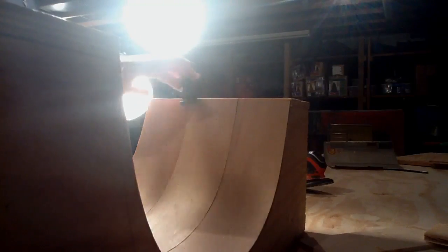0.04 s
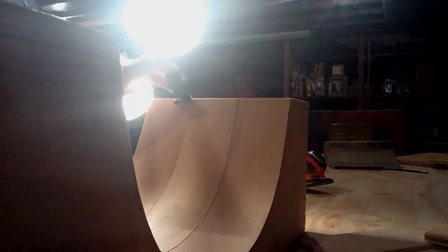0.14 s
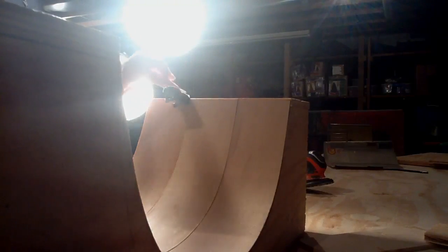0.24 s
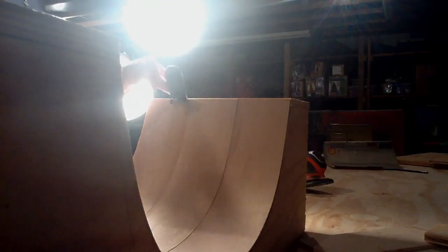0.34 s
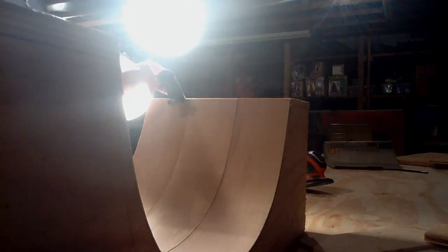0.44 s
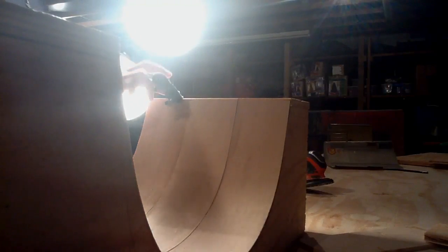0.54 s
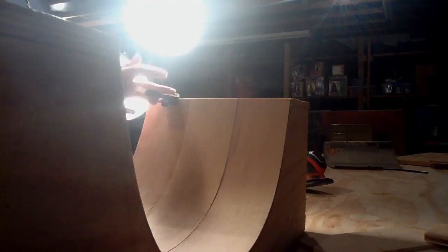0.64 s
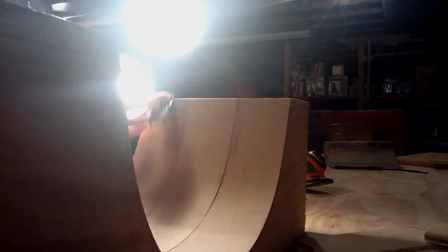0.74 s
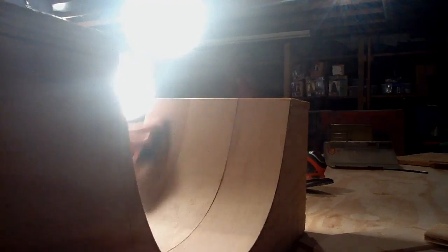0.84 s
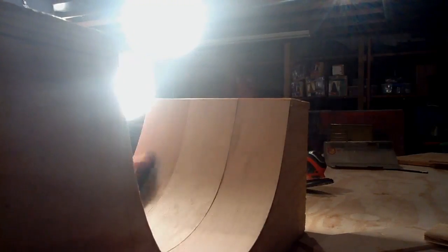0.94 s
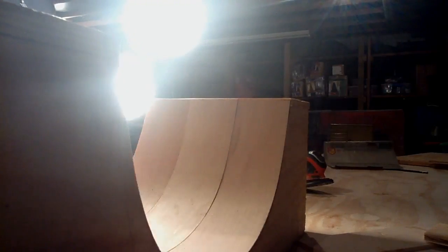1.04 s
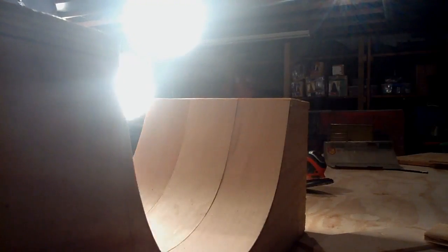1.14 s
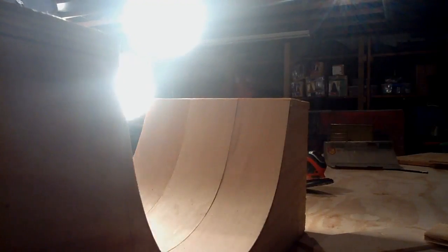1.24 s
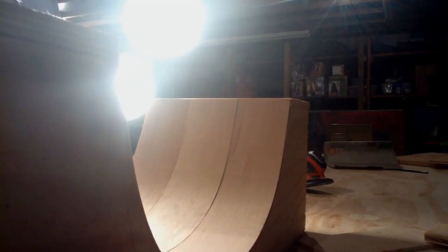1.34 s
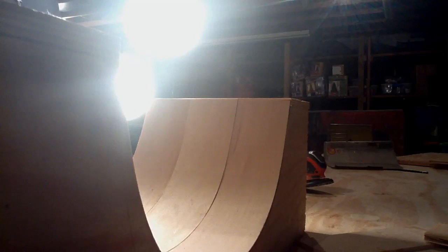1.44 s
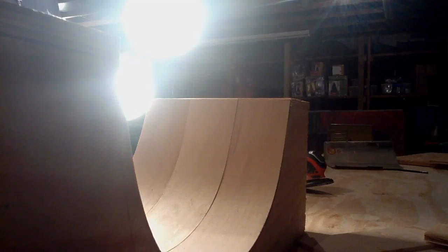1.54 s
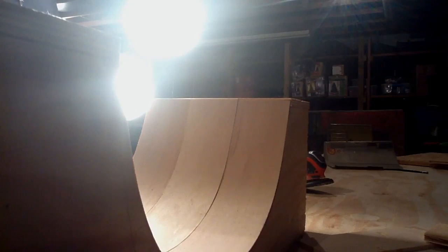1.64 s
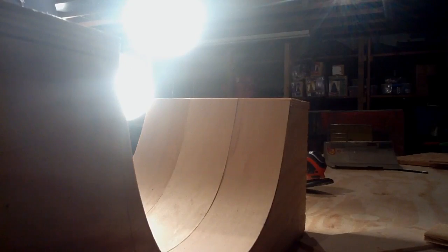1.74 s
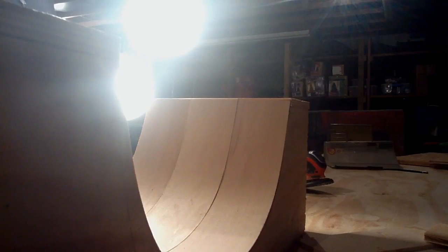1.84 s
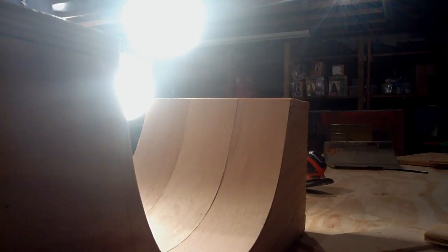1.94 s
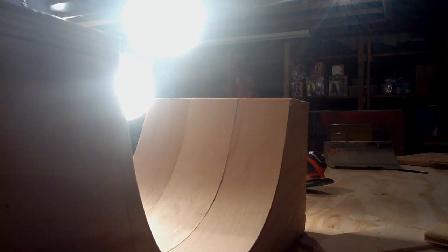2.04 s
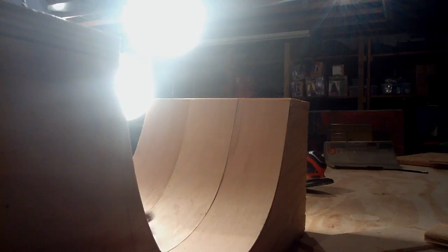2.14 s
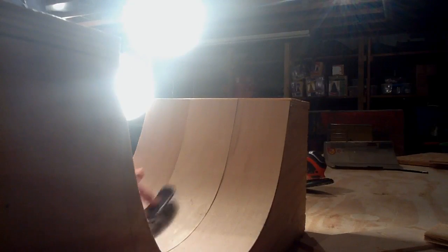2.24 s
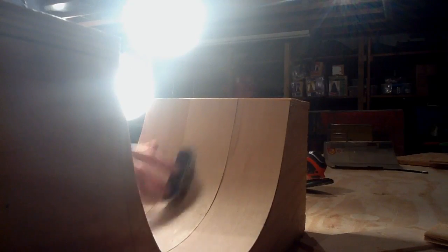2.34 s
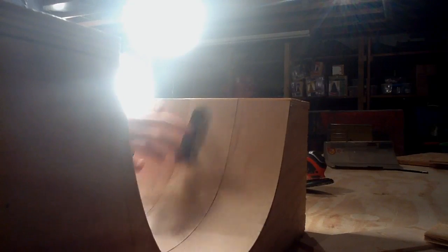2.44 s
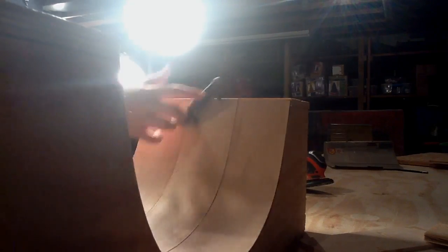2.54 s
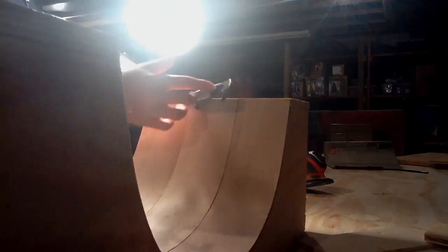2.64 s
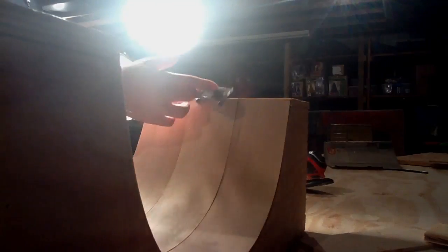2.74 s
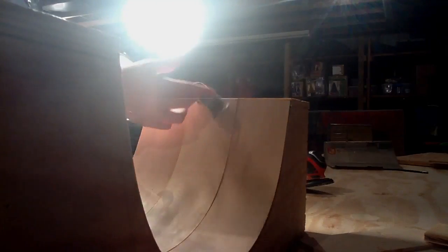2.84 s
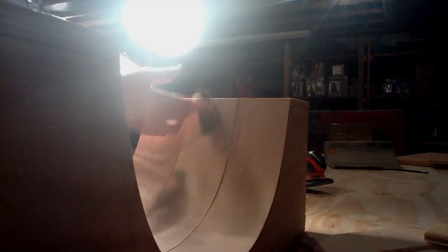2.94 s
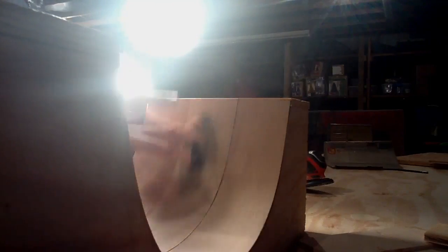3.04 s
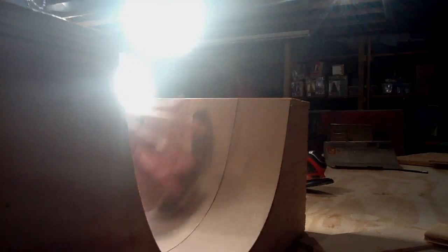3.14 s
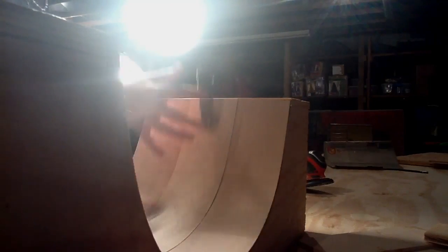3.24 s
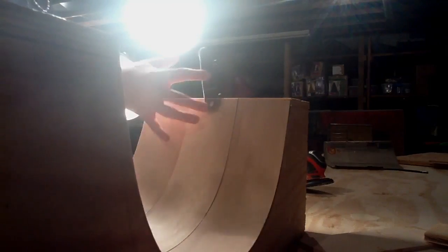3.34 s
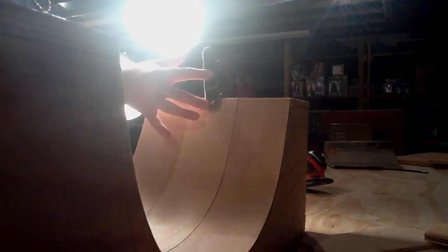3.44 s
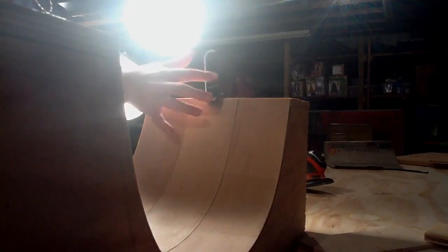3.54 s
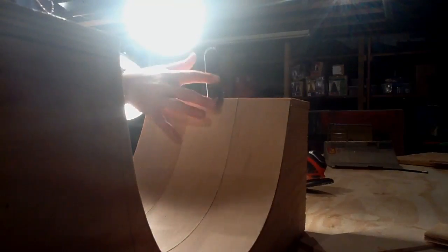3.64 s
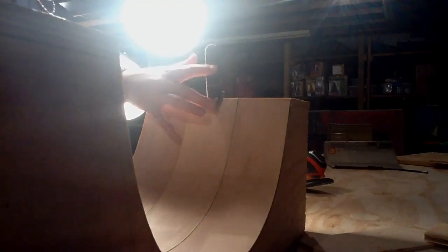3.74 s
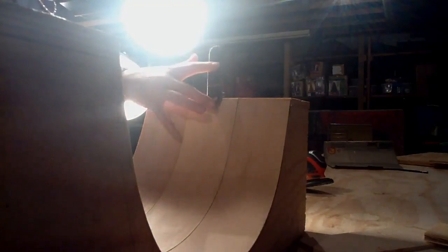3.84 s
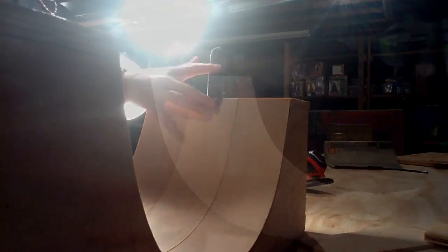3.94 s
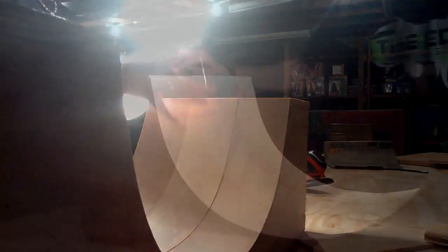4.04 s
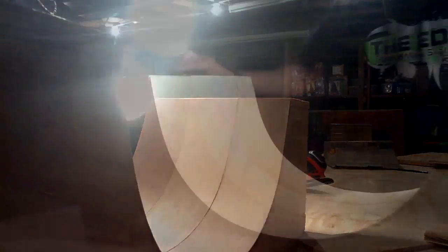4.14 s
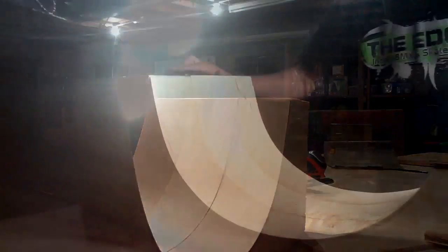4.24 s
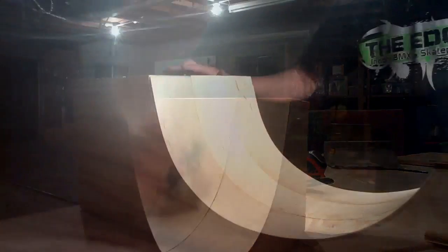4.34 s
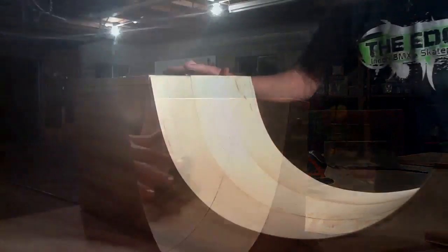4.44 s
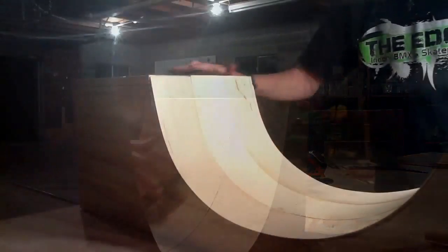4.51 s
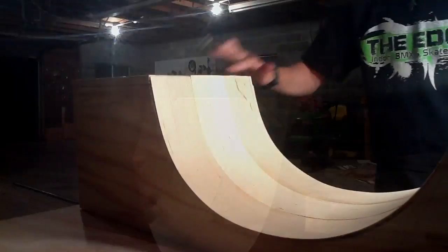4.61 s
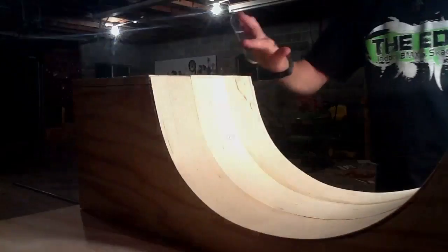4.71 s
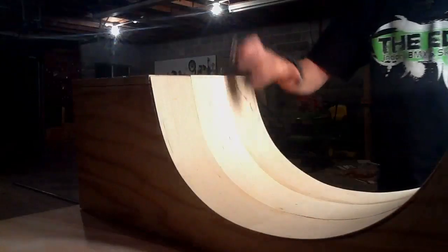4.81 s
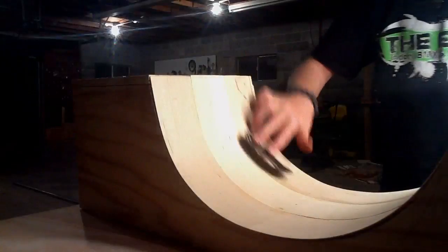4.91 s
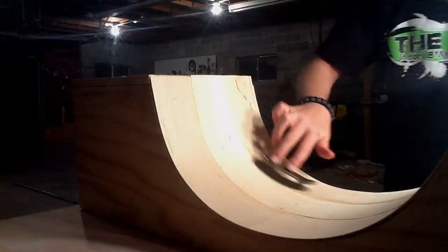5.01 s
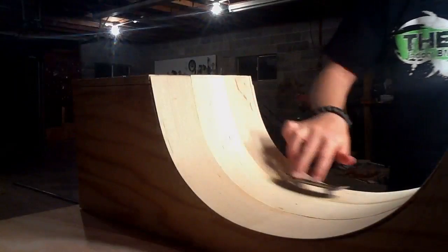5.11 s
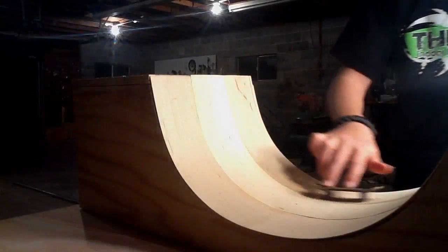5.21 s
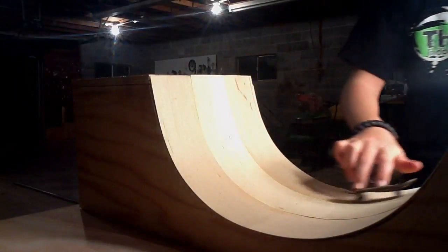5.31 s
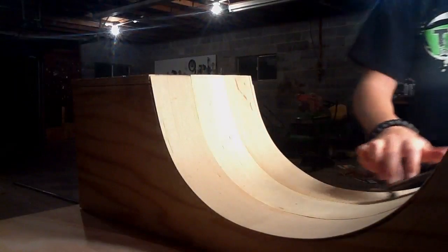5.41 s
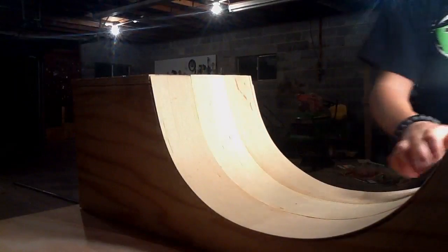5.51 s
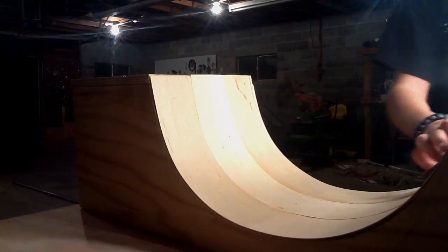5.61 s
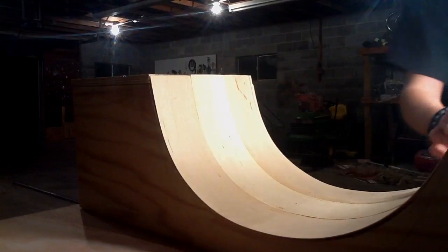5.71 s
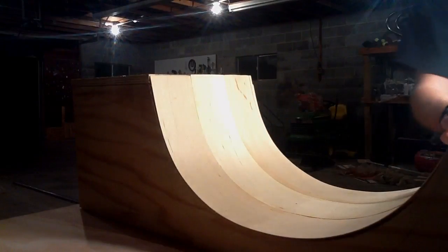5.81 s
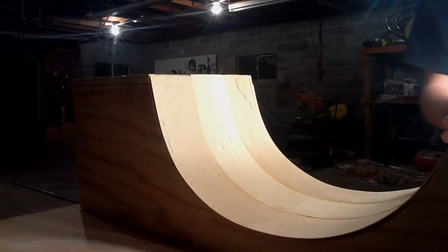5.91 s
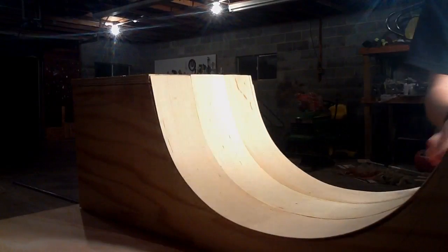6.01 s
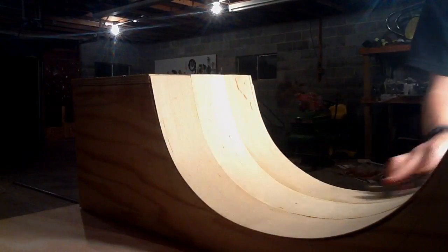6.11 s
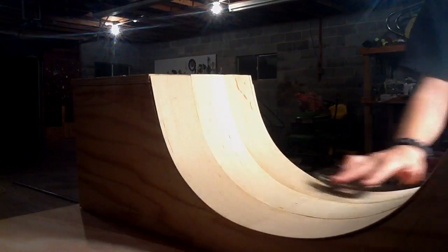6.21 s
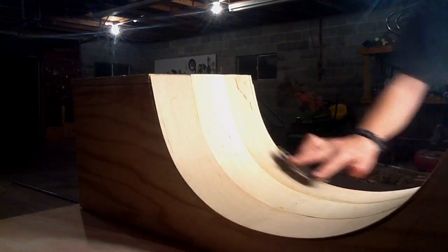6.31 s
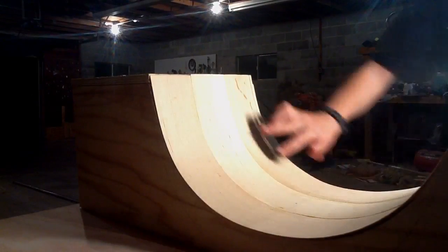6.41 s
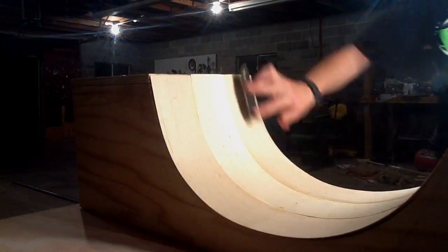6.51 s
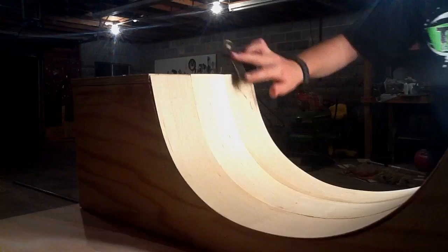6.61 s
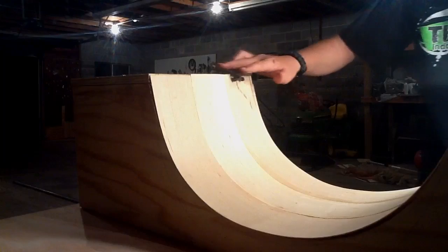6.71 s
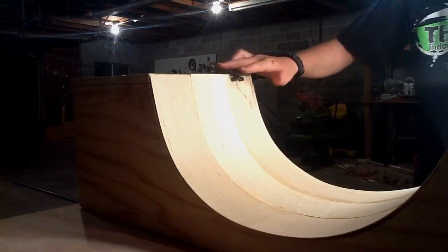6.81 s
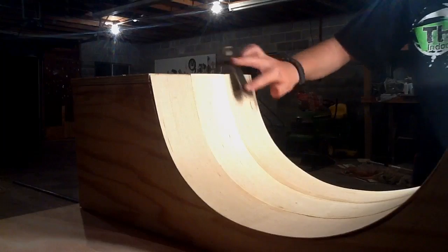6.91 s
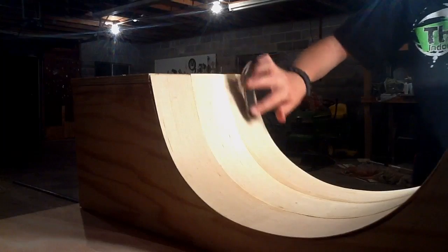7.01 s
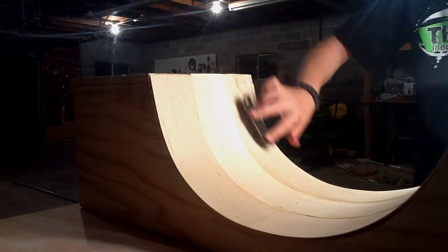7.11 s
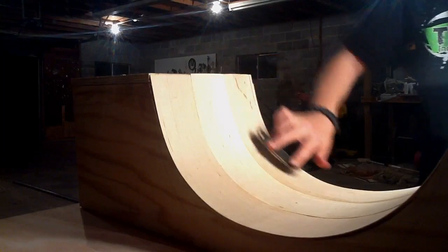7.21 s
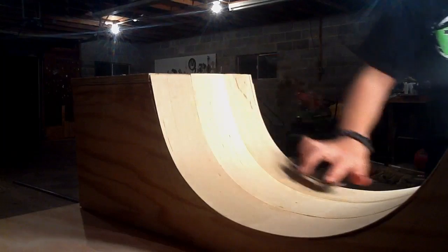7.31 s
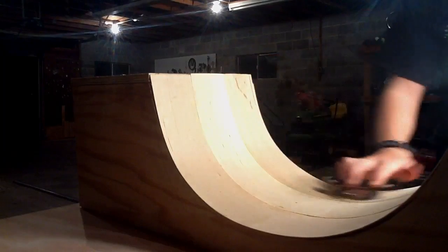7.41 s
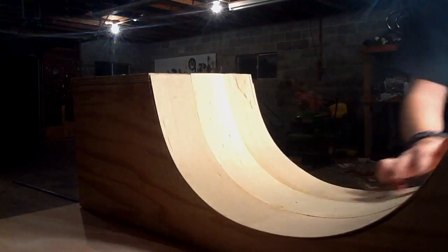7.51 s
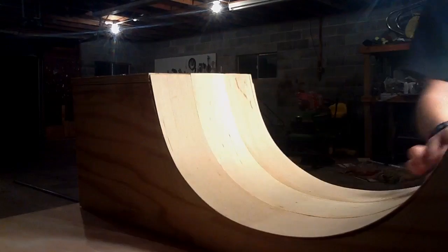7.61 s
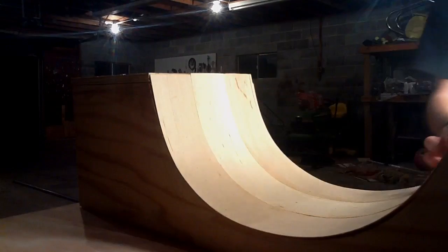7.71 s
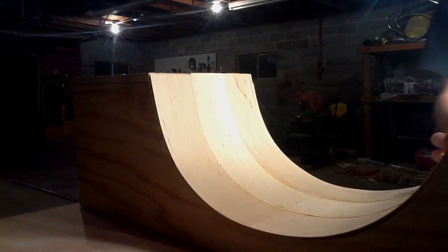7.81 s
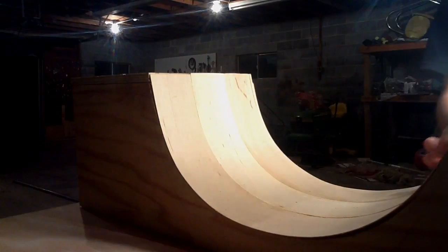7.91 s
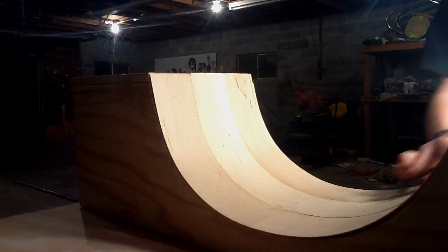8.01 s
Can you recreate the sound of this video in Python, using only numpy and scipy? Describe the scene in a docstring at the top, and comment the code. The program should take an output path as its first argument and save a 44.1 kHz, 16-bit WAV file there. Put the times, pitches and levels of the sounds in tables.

```python
"""Light knocks on hollow plywood, over steady microphone hiss: a toy skateboard is driven by hand
up and down a ramp in a barn. Its hard little wheels rattle over the grain and set the ramp ringing.
Taps and landings knock the same wood and echo briefly; hard landings jingle the loose axles.
The first ride breaks off and a low hum swells and fades. The second ride has more bass,
and a narrow whirr marks its lip tricks."""
import sys
import numpy as np
from scipy import signal
from scipy.fft import rfft, irfft
from scipy.io import wavfile

SR = 44100
rng = np.random.default_rng(int(sys.argv[2]) if len(sys.argv) > 2 else 0)


def materialize(psi):
    """Save the field psi as 16-bit PCM at rate SR to the path in sys.argv[1].

    A 1-D psi becomes a single channel; in a 2-D psi each row is a channel.
    """
    bounded = np.clip(np.atleast_2d(psi).T, -1, 1)
    quanta = np.round(bounded * 32767).astype(np.int16)
    wavfile.write(sys.argv[1], SR, quanta)


N = 355446

# Colour of the hiss. Each row: frequency in Hz, relative spectral level in dB.
HISS_SPECTRUM = [(18, -76), (62, -19), (173, 2), (256, -4), (410, -5.5), (443, 1.5), (492, -20.5),
                 (767, -18), (1260, -12), (2420, -19), (5170, -21), (6210, -22.5), (8280, -20),
                 (10700, -11.5), (15500, -30)]
# Deck and wheels hitting the ramp. Each row: start in seconds, panel peak in dB, boom and crack peaks
# in dB against it, panel pitch at the spot struck in Hz, contact time in seconds, hardness as a treble
# slope in dB per octave, crack pitch in Hz.
BLOWS = [(0.002, -36.5, 15.5, 2, 1300, 0.003, 14, 2290), (0.064, -44, 13.5, 3, 1210, 0.0047, 11, 2740),
         (0.395, -36.5, 10, -5.5, 696, 0.0069, 7, 2440), (0.662, -26, 1, -13, 680, 0.0062, 3, 2290),
         (0.755, -51, 13, -14, 703, 0.0049, 7, 2300), (0.779, -29, 0, -10, 690, 0.0021, 20, 2390),
         (0.814, -28, -30, -5.5, 700, 0.0033, 6, 2380), (0.965, -20, 9, 5, 1570, 0.0066, -1, 4800),
         (0.969, -13.5, 3.5, 2, 1580, 0.005, -10, 2700), (1.525, -13, -20, -10, 1010, 0.0034, -12, 4900),
         (1.538, -27.5, -6.5, 2.3, 1900, 0.003, -9, 3620), (2.521, -35, 20.5, 6.5, 950, 0.0037, -3, 3010),
         (2.678, -18.5, 7.5, -18, 1135, 0.0023, 13, 2760), (2.764, -43, 9, 1, 977, 0.0056, 23, 4940),
         (2.841, -19, -7.5, 6.5, 2010, 0.0022, -12, 4600), (2.853, -25.5, 0, -11, 1240, 0.0035, 5, 4000),
         (2.874, -25, -13, 0, 1090, 0.0036, -14, 2440), (2.932, -34, 4, -5, 1090, 0.0034, 3, 2850),
         (2.974, -28.5, 4, -5, 1120, 0.003, 4, 2990), (2.995, -25, 4, -7, 1080, 0.0037, -7, 2820),
         (3.117, -32, -4, -4, 1100, 0.0013, 8, 6200), (3.160, -16, 3.5, 2.5, 1060, 0.012, -37, 2760),
         (3.173, -10.5, -14, -3.5, 1130, 0.0037, -11, 2800),
         (3.318, -21.5, -19, -0.5, 1520, 0.0088, -22, 3250),
         (3.403, -18.5, 1.5, -9, 1300, 0.0074, -9, 2800), (3.627, -22, -2, -6, 700, 0.0025, -11, 2700),
         (3.942, -28, -2.5, -1.5, 1800, 0.0088, 8, 2640), (4.052, -45.5, 12, -7, 1710, 0.0041, 2, 2680),
         (4.174, -55.5, 3.5, 10, 1920, 0.011, -7, 3020), (4.319, -45.5, -18, 13, 1420, 0.0039, 17, 7500),
         (4.379, -3.5, -4.5, 0.5, 1570, 0.0024, 1.5, 2270), (4.652, -29.5, 7.5, 7, 1540, 0.0078, 6, 3020),
         (4.884, -28.5, -12, 0.5, 1170, 0.0056, -1.5, 2820), (4.903, -17, -13, -11, 830, 0.011, -5, 3360),
         (4.930, -9.5, -4, 6, 820, 0.0026, 6, 6700), (4.936, -4, 0.5, -6, 800, 0.0046, -4, 2800),
         (4.966, -15, -8, -2.5, 1290, 0.009, 0, 4900), (4.979, -17, -1, -3, 830, 0.0049, 1, 2840),
         (5.707, -49, 21.5, -3, 832, 0.0022, 2, 2630), (6.495, -38, 14, -12, 900, 0.0066, -3, 2400),
         (6.726, -15, -6, -19, 810, 0.0042, 13, 2410), (6.74, -11.5, -9, -1.5, 1470, 0.0023, 7, 3160),
         (6.751, -29.5, -14, 8, 1490, 0.0059, 5, 6440), (6.88, -38, -10, 1, 1500, 0.0025, 13, 3000),
         (7.192, -36.5, 5, -14, 1200, 0.0016, 7, 3000), (7.34, -34, -19, 7, 1110, 0.003, 3, 8000),
         (7.371, -26, -23, 1.5, 1800, 0.0049, 6, 3460), (7.477, -32.5, -25, 11.5, 1500, 0.014, 9, 3330),
         (7.583, -22, -19, 2.5, 1570, 0.0058, 11, 3800), (7.585, -23, 7, -9, 1260, 0.005, -5, 2880),
         (7.597, -30, 0, 3, 1500, 0.0046, -3, 6500), (7.647, -43.5, 20, -18, 1250, 0.0058, 0.1, 3670),
         (7.678, -46, 25.5, -13, 730, 0.0024, 0.1, 2990), (8.045, -32, 11.5, -7, 1800, 0.0056, 9, 2310)]
# The ramp's resonances. Each row: pitch in Hz, level in dB, time to fall 60 dB in seconds.
RAMP_MODES = [(133.4, -16.5, 0.1), (180, -12, 0.15), (248.6, -6, 0.052), (305.6, -5.5, 0.1),
              (343.4, 0.5, 0.077), (400, 1.5, 0.088), (462, 1, 0.048), (510.3, 0.5, 0.054),
              (560, -3, 0.056), (602.5, -15.5, 0.13), (633, -6.5, 0.037), (700.5, 4.5, 0.015),
              (833.3, -4.5, 0.054), (1018, -1.5, 0.031), (1116, -4.5, 0.071), (1268, 3.5, 0.017),
              (1464, 1.5, 0.023), (1706, -5.5, 0.052), (1802, -4, 0.054), (2090, 8.5, 0.0033)]
# Contour of the crowded upper modes of deck and wood. Each row: frequency in Hz, level in dB.
UPPER_CONTOUR = [(2200, -6), (2850, -2.5), (3800, -6), (5400, -9), (7000, -12), (8500, -19), (11000, -13.5),
                 (15000, -16)]
# One list per pass of the wheels. Each row: time in seconds, panel rattle in dB, boom in dB against it.
PASSES = [
    [(1.01, -40, 5), (1.04, -29.5, -15), (1.1, -33.5, 3.5), (1.152, -30, -15), (1.278, -26, -7),
     (1.31, -24, -4), (1.36, -23.5, -6), (1.39, -27, -4), (1.49, -37.5, -14)],
    [(1.57, -43, -20), (1.664, -51.5, -16), (1.832, -41, -7), (1.846, -35.5, -1.5), (2.04, -33.5, -1),
     (2.1, -27, -4), (2.212, -32.5, -6), (2.422, -27.5, 6), (2.492, -29.5, 1), (2.52, -35.5, -8),
     (2.64, -44, -2)],
    [(2.89, -44, -14), (2.928, -42, 8), (3.022, -34.5, 1.5), (3.15, -36, 12), (3.178, -28, 8),
     (3.188, -31, 11.5), (3.236, -28.5, -12), (3.262, -26.5, -7), (3.458, -26, -2.5), (3.527, -32.5, -6.5)],
    [(3.965, -45.5, 8), (4.023, -56, 0), (4.061, -49.5, 17), (4.099, -54, -2), (4.145, -64, 3),
     (4.179, -55, -2), (4.199, -64, -3), (4.291, -68.5, 2), (4.319, -58, 6), (4.345, -56, -3)],
    [(4.43, -46, -8), (4.462, -34, -22), (4.506, -41, 1), (4.558, -39.5, -3.5), (4.606, -29.5, 0.5),
     (4.68, -37.5, 0), (4.718, -44, -13), (4.744, -44, 5.5), (4.792, -55.5, -24), (4.85, -58.5, -15)],
    [(5.01, -32.5, -3.5), (5.3, -40, 2), (5.426, -43.5, 0.5), (5.558, -43, 8), (5.592, -39.5, 4.5),
     (5.63, -47.5, 9), (5.68, -50, -6), (5.706, -52, 14), (5.76, -43, 1.5), (5.82, -48, 2.5),
     (5.902, -61.5, -1), (5.95, -59, -10)],
    [(5.99, -55, 9), (6.078, -38.5, 11), (6.122, -34.5, 10.5), (6.144, -35.5, 8), (6.2, -33.5, -2.5),
     (6.334, -33.5, -5), (6.442, -35.5, 0.5), (6.53, -30, -2), (6.59, -34.5, -10), (6.69, -49.5, -5)],
    [(7.04, -48, -8), (7.082, -41.5, -6), (7.114, -41, -16), (7.124, -47, 8), (7.134, -39.5, -2),
     (7.248, -34.5, 0), (7.272, -38, -5), (7.346, -31, -4), (7.498, -33.5, -8.5), (7.55, -41.5, -8)],
    [(0.03, -52, 13), (0.096, -53.5, 13.5), (0.176, -71, 15), (0.202, -63, 15), (0.21, -75, 20)],
    [(0.7, -51, 2), (0.746, -59.5, 7), (0.78, -45.5, 14), (0.814, -44, 0.5), (0.93, -42.5, 5)],
    [(2.72, -50, 0), (2.744, -65, 7), (2.754, -59, 5), (2.774, -58, 4), (2.8, -59, 8)],
    [(6.77, -41, -9), (6.782, -49, -1), (6.824, -44, -9.5), (6.962, -57.5, 4), (7.0, -55.5, -21)],
    [(7.62, -38.5, 2), (7.678, -35.5, -5), (7.69, -42.5, -4), (7.714, -44.5, 2.5), (7.89, -61, 2)],
    [(7.93, -60.5, 12.5), (7.992, -52, 14), (8.004, -43.5, 7), (8.024, -44.5, 18), (8.04, -37.5, 3)],
]
# Each stretch of ramp has its own colour. Each row: start in seconds, then rumble and grit in dB
# against a rattle at its usual level.
STRETCH_COLOURS = [(0, -2, -7), (.66, -7, -15), (.97, -1.5, -9), (1.53, -1.5, -5.5), (2.1, -3, -11.5),
                   (2.84, -2.5, -7), (3.2, -1, -10), (3.6, -4, -5.5), (4.38, -4, -2), (4.93, -5, -8),
                   (5.7, -5, -14), (6.0, -3.5, -10), (6.49, 1, -7.5), (6.6, 0, -11), (6.73, -7.5, -1),
                   (7.02, -5, -12), (7.59, -11, -9.5)]
# Pitches favoured by the spot being ridden. Each row: time in seconds, boom in Hz, panel in Hz.
SPOT_PITCHES = [(0.0, 480, 1120), (0.31, 490, 1130), (0.45, 587, 756), (0.52, 520, 1340), (0.76, 655, 750),
                (0.99, 484, 1360), (1.28, 608, 930), (2.42, 483, 1110), (3.43, 580, 1030),
                (4.03, 504, 1710), (4.1, 487, 990), (4.15, 530, 1590), (4.84, 548, 1560), (4.89, 584, 875),
                (5.29, 525, 1300), (5.55, 515, 1290), (5.99, 480, 740), (6.17, 526, 1320), (6.68, 530, 905),
                (6.79, 583, 1464), (7.11, 540, 900), (7.44, 590, 1160), (7.55, 510, 1380), (8.0, 487, 970),
                (8.05, 487, 1520)]
# Loose axles and wheels. Each row: start in seconds, level in dB, time to fall 60 dB in seconds.
AXLE_JINGLES = [(0.969, -51, .1), (2.843, -48, .09), (3.174, -43, 0.13), (3.405, -45, 0.099),
                (4.379, -27, .17), (4.655, -43, 0.22), (4.883, -39, .12), (4.931, -43, 0.53)]
# The hum's swell. Each row: time in seconds, level in dB.
HUM_SWELL = [(3.15, -98), (3.3, -62), (3.6, -66), (3.73, -60), (4.13, -64), (4.3, -69), (4.5, -95)]
# Lip-trick whirrs. Each row: start in seconds, centre in Hz, level in dB, attack in seconds,
# fade in dB per second.
LIP_WHIRRS = [(3.948, 1753, -40.5, .003, 106), (4.57, 1685, -27, .035, 136), (6.745, 1600, -36, .003, 80)]

RUMBLE, BOOM, PANEL, CRACK = range(4)  # families of modes, low to high
FAMILY_EDGES_HZ = (440, 700, 2200)
TIME = np.arange(N) / SR


def from_db(db):
    return 10 ** (np.asarray(db) / 20)


def rms_one(x):
    return x / np.sqrt(np.mean(x ** 2) + 1e-20)


def filtered(x, order, hz, kind="low"):
    return signal.sosfilt(signal.butter(order, hz, kind, fs=SR, output="sos"), x)


def in_time(rows):
    times, *columns = np.transpose(rows)
    return [np.interp(TIME, times, column) for column in columns]


def at_hz(points, hz):
    points_hz, levels_db = np.transpose(points)
    return np.interp(np.log(hz), np.log(points_hz), levels_db)


def bell(hz, centre_hz, octaves):
    return np.exp(-(np.log2(hz / centre_hz) / octaves) ** 2)


def drift(rate_hz):
    """A smooth random wobble with a spread of about 1."""
    pole = np.exp(-80 * np.pi * rate_hz / SR)
    slow = signal.lfilter([1], [1, -2 * pole, pole ** 2], rng.standard_normal(N // 40 + 2002))[2000:]
    return np.interp(np.arange(N) / 40, np.arange(len(slow)), rms_one(slow))


def microphone_hiss(level_db=-56.5):
    """A smooth noise bed with a warm low end and a bump in the high treble."""
    hz = np.maximum(np.fft.rfftfreq(N, 1 / SR), 10)
    spectrum = rfft(rng.standard_normal(N)) * from_db(at_hz(HISS_SPECTRUM, hz))
    return from_db(level_db) * rms_one(irfft(spectrum, N))


def wood_modes(upper_cycles=15):
    """The ramp's modes plus a crowd of short upper ones, and the family of each."""
    hz = np.geomspace(2250, 15000, num=58)
    modes = np.vstack([RAMP_MODES, np.transpose([hz, at_hz(UPPER_CONTOUR, hz), upper_cycles / hz])])
    return modes, np.digitize(modes[:, 0], FAMILY_EDGES_HZ)


def radiated(x, family):
    """A family of modes sends out little sound below or far above its own range."""
    edges_hz = [140, *FAMILY_EDGES_HZ, 10000]
    return filtered(filtered(x, 3, .8 * edges_hz[family], "high"), 1, 1.6 * edges_hz[family + 1])


def knocks(uneven_db=1.5, boom_rise_s=.0025, contact_samples=3000):
    """Each knock is a short rattle of contacts that strikes every mode with a strength of its own."""
    modes, family = wood_modes()
    hz, t = modes[:, 0], np.arange(SR // 5) / SR
    damped_t60 = .93 * modes[:, 2:]  # deck and fingers pressed on the wood shorten its ring
    rings = np.sin(2 * np.pi * hz[:, None] * t) * from_db(modes[:, 1:2] - 60 * t / damped_t60)
    treble_octaves = np.log2(np.maximum(hz / FAMILY_EDGES_HZ[-1], 1))
    hollow_db = 4 * bell(hz, 515, octaves=.2)  # blows favour the note of the hollow
    out = np.zeros(N + SR)
    for start, panel_db, boom_db, crack_db, spot_hz, contact_s, slope_db, crack_hz in BLOWS:
        scatter = rng.standard_normal(len(modes))
        age = t[:contact_samples] / contact_s
        force = age ** .15 * np.exp(-age) + .61 * np.exp(-age / 3.5)  # a blow, then loose parts rattle
        contact = filtered(force * rng.standard_normal(contact_samples), 2, 7500)
        # The spot favours its own modes; panel modes above it are struck less.
        octaves_above = np.log2(np.maximum(hz / spot_hz, 1)) * (family == PANEL)
        spot_db = 8 * bell(hz, spot_hz, octaves=.18) - 3 * octaves_above
        bite_db = 13 * bell(hz, crack_hz, octaves=.13) + slope_db * treble_octaves
        polarity = np.where(family == CRACK, 1, np.sign(np.roll(scatter, 1)))  # in or out of step
        strength = polarity * from_db(uneven_db * scatter + spot_db + hollow_db + bite_db)
        at = round(start * SR)
        for k, peak_db in enumerate(panel_db + np.array([boom_db - 9.5, boom_db, 0, crack_db])):
            sound = signal.fftconvolve((strength * (family == k)) @ rings, contact)
            if k == BOOM:  # the air under the ramp takes a few cycles to build up
                sound *= (1 - np.exp(-TIME[:len(sound)] / boom_rise_s)) ** 2
            sound = radiated(sound, k)
            out[at:at + len(sound)] += from_db(peak_db) * sound / np.abs(sound).max()
    return out[:N]


def barn_echoes(x, t60=.27, level_db=-11.5, first_wall_s=.008):
    """A short, diffuse tail that starts with the first wall's reflection."""
    t = np.arange(SR // 2) / SR
    echoes = rng.standard_normal(len(t)) * from_db(-60 * t / t60) * (t > first_wall_s)
    echoes = filtered(echoes, 1, 21600)
    return from_db(level_db) * signal.fftconvolve(x, echoes / np.sqrt(np.sum(echoes ** 2)))[:N]


def ring(force, hz, t60):
    """One mode of the wood: every bump starts a dying sine."""
    decay, step = from_db(-60 / (t60 * SR)), 2 * np.pi * hz / SR
    return signal.lfilter([0, np.sin(step)], [1, -2 * decay * np.cos(step), decay ** 2], force)


def spot_gains(modes, family, hop):
    """Modes near the ridden spot's pitch come forward while each family keeps its power."""
    boom_hz, panel_hz = np.array(in_time(SPOT_PITCHES))[:, ::hop]
    hz = modes[:, :1]
    boom_db = 9.5 * bell(hz, boom_hz, octaves=.12)
    panel_db = 6 * bell(hz, panel_hz, octaves=.41)
    gain = from_db(np.where(hz < FAMILY_EDGES_HZ[BOOM], boom_db, panel_db))
    power = from_db(modes[:, 1:2]) ** 2 * modes[:, 2:]
    for k in range(4):
        own = family == k
        gain[own] /= np.sqrt(np.sum(gain[own] ** 2 * power[own], axis=0) / np.sum(power[own]))
    return gain


def rolling_levels(usual_db=-40.5, rise_s=.04, hold_s=.04, stop_s=.01):
    """Each pass lifts the rattle and boom; rumble and grit follow most of the rattle's swing."""
    rattle_db, hollow_db = np.full(N, -83.), np.full(N, 22.)  # between passes the ramp only stirs
    for rows in PASSES:
        start, (end, *last) = rows[0][0], rows[-1]
        release = [(end + hold_s, *last), (end + hold_s + stop_s, -99, 0)]
        pass_db, pass_hollow_db = in_time([(start - rise_s, -99, 0), *rows, *release])
        hollow_db = np.where(pass_db > rattle_db, pass_hollow_db, hollow_db)
        rattle_db = np.maximum(pass_db, rattle_db)
    starts, rumble_offset_db, grit_offset_db = np.transpose(STRETCH_COLOURS)
    stretch = np.maximum(np.searchsorted(starts, TIME) - 1, 0)
    swing_db = rattle_db - usual_db
    rumble_db = usual_db + rumble_offset_db[stretch] + .79 * swing_db
    grit_db = usual_db + grit_offset_db[stretch] + .87 * swing_db
    return rumble_db, rattle_db + hollow_db, rattle_db, grit_db


def rolling_wheels(bumps_per_s=3500, bump_spread_db=1.5, wander_db=3.5, judder_db=.72, hop=200):
    """Wheels meet wood fibres at random; as the contact point travels each mode is fed more or less."""
    modes, family = wood_modes()
    judder = from_db(judder_db * drift(24))
    wander = [from_db(wander_db * drift(4.4)) for _ in range(7)]
    spot = spot_gains(modes, family, hop)
    bands = np.zeros((4, N))
    for k, (hz, level_db, t60) in enumerate(modes):
        if k % 4 == 0:  # neighbouring modes share a train of bumps
            clicks = (rng.random(N) < bumps_per_s / SR) * rng.choice([-1, 1], N)
            sizes = from_db(bump_spread_db * np.minimum(rng.exponential(1, N), 4))
            bumps = clicks * sizes * judder + 1e-18
        force = bumps * wander[k % 7] * np.repeat(spot[k], hop)[:N]
        bands[family[k]] += (-1) ** k * from_db(level_db) * ring(force, hz, t60)
    bands[CRACK] = filtered(bands[CRACK], 1, 10000)  # the grit is slightly dulled at the very top
    return sum(from_db(db) * rms_one(radiated(bands[k], k)) for k, db in enumerate(rolling_levels()))


def axle_jingles(clicks_per_s=7600, band_hz=(1500, 12000)):
    """Loose axles and wheels shake out a bright, dying spray of clicks after hard landings."""
    clicks = (rng.random(N) < clicks_per_s / SR) * rng.standard_normal(N)
    envelope = sum((TIME >= start) * from_db(level_db - 60 * np.clip(TIME - start, 0, 1) / t60)
                   for start, level_db, t60 in AXLE_JINGLES)
    return envelope * rms_one(filtered(clicks, 1, band_hz, "band"))


def low_hum(pitch_hz=95, waver_hz=4.7, waver_db=2.5):
    """A low tone that swells and fades, wavering in pitch and strength."""
    phase = 2 * np.pi * np.cumsum(pitch_hz + waver_hz * drift(17)) / SR
    level_db = in_time(HUM_SWELL)[0] + waver_db * drift(9)
    return np.sqrt(2) * from_db(level_db) * np.sin(phase)


def lip_whirrs(width_hz=220, sag_hz_per_s=194, length_s=.34):
    """Narrow noise, perhaps the deck sliding on the edge: it swells fast, then fades as its pitch sags."""
    out = np.zeros(N)
    noise = filtered(rng.standard_normal((2, N)), 2, width_hz / 2)
    for start, hz, level_db, attack_s, fade_db_per_s in LIP_WHIRRS:
        age = np.maximum(TIME - start, 0)
        phase = 2 * np.pi * np.cumsum(hz - sag_hz_per_s * np.minimum(age, 1)) / SR
        band = rms_one(noise[0] * np.cos(phase) + noise[1] * np.sin(phase))
        gate = np.minimum(age / attack_s, 1) * (age < length_s)
        fade = from_db(-fade_db_per_s * age) + from_db(-41 - 33 * age)  # with a faint, slower tail
        out += from_db(level_db) * gate * fade * band
    return out


def scene(second_ride_s=3.6):
    """Two rides; the microphone stands elsewhere for the second and hears more bass."""
    blows = knocks()
    skating = blows + barn_echoes(blows) + rolling_wheels() + lip_whirrs() + axle_jingles()
    thin, full = filtered(skating, 2, 314, "high"), filtered(skating, 2, 12, "high")
    rides = np.where(TIME < second_ride_s, thin, full)
    return (rides + microphone_hiss() + low_hum())[None]


def record(dry, ceiling=.97, cutoff_hz=15800):
    """Any peak over the ceiling is clipped, then the top is cut steeply."""
    top_cut = signal.cheby2(20, 60, cutoff_hz, fs=SR, output="sos")
    return signal.sosfilt(top_cut, np.clip(dry, -ceiling, ceiling))


dry = scene()
out = record(dry)
materialize(out)
```